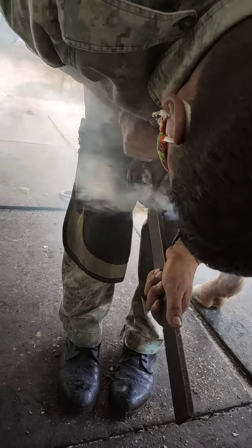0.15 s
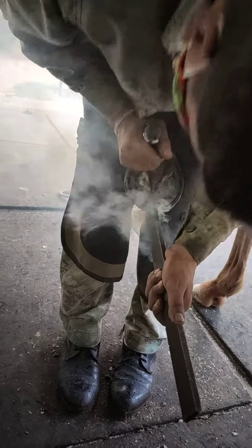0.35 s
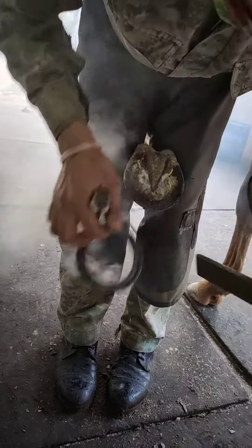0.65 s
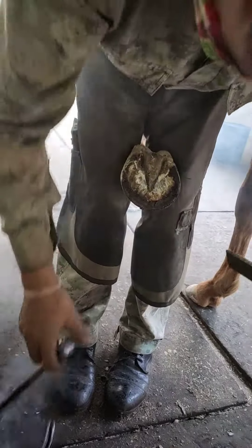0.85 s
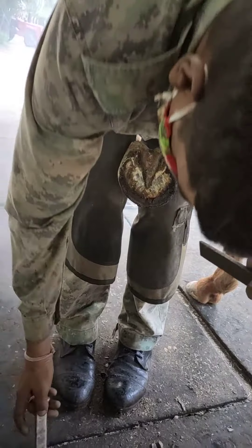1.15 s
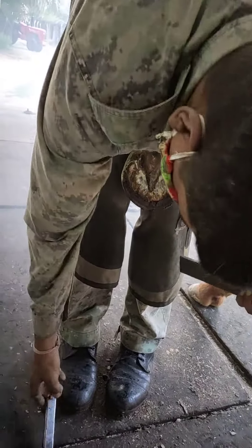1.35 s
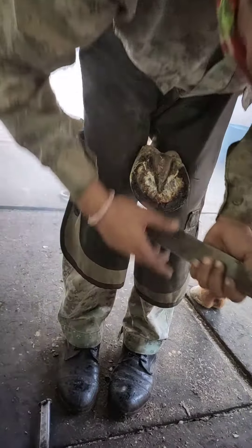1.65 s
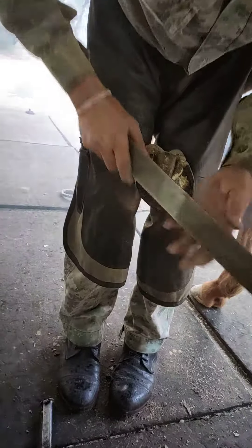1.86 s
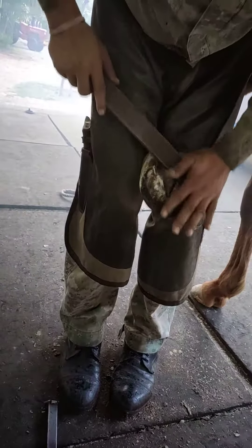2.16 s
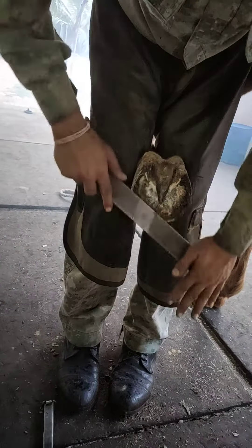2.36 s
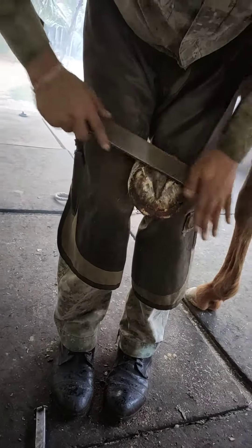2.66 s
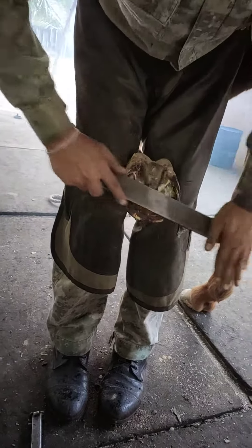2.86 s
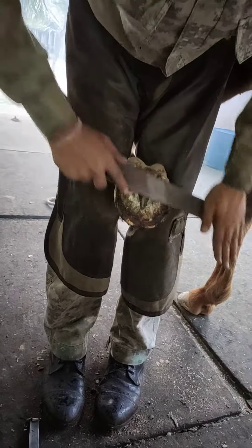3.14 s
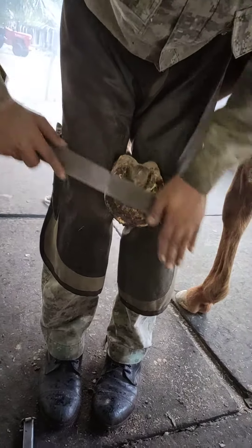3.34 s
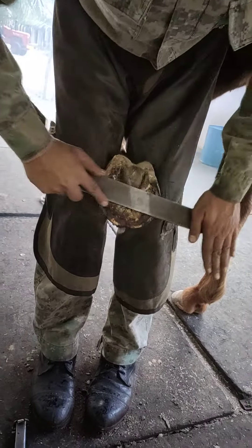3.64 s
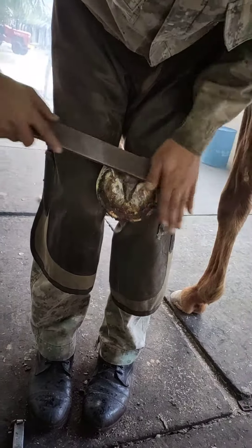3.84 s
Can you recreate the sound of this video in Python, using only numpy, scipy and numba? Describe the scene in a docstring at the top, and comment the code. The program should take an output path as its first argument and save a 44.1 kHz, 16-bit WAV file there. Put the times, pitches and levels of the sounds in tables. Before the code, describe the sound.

Outdoors or in an open shelter, wind buffeting dominates the microphone. Hot horn sizzles and snaps briefly, fades, and then a metal rasp scrapes the hoof in short gritty, ringing strokes, with a low fan-like roar behind.

```python
"""Gusty wind buffets and overloads two microphone ports separately, over the faint roar of a forge or fan.
A farrier lifts a hot shoe off a hoof: the scorched horn fizzes in tiny bursts of steam and spits sharp clicks.
After one soft swish, a rasp touches the horn, then is drawn to and fro: its teeth jolt and ring the blade,
while a dense spray of chips makes the grit. Wind is shaped puffs; the roar is coloured noise with two thin tones."""
import sys
import numpy as np
from scipy import signal
from scipy.fft import rfft, irfft
from scipy.io import wavfile
from scipy.ndimage import uniform_filter1d, map_coordinates
from numba import njit

SR = 44100
rng = np.random.default_rng(int(sys.argv[2]) if len(sys.argv) > 2 else 0)


def bounce(signal):
    """Save signal as a 16-bit WAV file at the path given by the first command-line argument."""
    frames = np.transpose(np.atleast_2d(signal))
    limited = np.clip(frames, -1, 1)
    pcm = np.round(limited * 32767).astype(np.int16)
    wavfile.write(sys.argv[1], SR, pcm)


def boost_factor(decibels):
    """Convert a level in decibels to a linear amplitude factor."""
    exponent = np.asarray(decibels, float) / 20
    return 10 ** exponent


N = 176400
TIME = np.arange(N) / SR  # s

# the left port hears the work later and louder
LAG_SAMPLES, PAN_DB = 3.46, 2.5
DIRECT = 0.26  # power share of the fizz and grit common to both ports


def curve(table, col):
    """One column of a time table, joined by straight lines."""
    table = np.array(table, float)
    return np.interp(TIME, table[:, 0], table[:, col])


def unit(x):
    """Scaled to rms 1."""
    return x / np.sqrt(np.mean(x ** 2, axis=-1, keepdims=True))


def colour(x, points):
    """Filter by (Hz, dB) points on a log-frequency axis."""
    hz, db = np.array(points, float).T
    bins_hz = np.arange(N // 2 + 1) * SR / N
    gain_db = np.interp(np.log(bins_hz + 1), np.log(hz), db)
    return irfft(rfft(x) * boost_factor(gain_db), N)


@njit
def svf(x, hz, width):
    """State-variable filter with moving centre: band and low outputs."""
    band, low, b, l = np.empty(len(x)), np.empty(len(x)), 0., 0.
    for i in range(len(x)):
        g, k = np.tan(np.pi * hz[i] / SR), width[i] / hz[i]
        v = (b + g * (x[i] - l)) / (1 + g * (g + k))
        low[i] = l + g * v
        b, l, band[i] = 2 * v - b, 2 * low[i] - l, k * v
    return band, low


def band(x, hz, width):
    """Band-pass, fixed or moving."""
    return svf(x, hz + np.zeros(N), width + np.zeros(N))[0]


def low(x, hz):
    """Two-pole low-pass, fixed or moving."""
    return svf(x, hz + np.zeros(N), 1.25 * hz + np.zeros(N))[1]


def walk(rate):
    """Random levels held 1 / rate s and slewed twice."""
    k = int(SR / rate)
    held = np.repeat(rng.standard_normal(N // k + 1), k)
    return 1.32 * uniform_filter1d(uniform_filter1d(held, k), k)[:N]


def clicks(rate, scatter):
    """Random impulses, rate per second, a few much larger than the rest."""
    happens = rng.random(N) < rate / SR
    size = np.minimum(rng.exponential(size=N), 3.5)
    sign = np.sign(rng.standard_normal(N))
    return unit(happens * boost_factor(scatter * size) * sign)


def decay(x, t60):
    """Each impulse dies away exponentially, by 60 dB in t60 seconds."""
    return signal.lfilter([1], [1, -np.exp(-np.log(1000) / (t60 * SR))], x)


def hump(middle, length, sharp=1.1):
    """Rounded swell of a movement that speeds up and slows down."""
    phase = np.clip((TIME - middle) / length, -.5, .5)
    return np.cos(np.pi * phase).clip(0) ** sharp


def ports(make, pan_db, direct):
    """A near source: part arrives directly at both ports, part is scattered and unlike left and right."""
    common = make()
    late = map_coordinates(common, [np.arange(N) - LAG_SAMPLES], mode="mirror")
    scattered = np.array([make(), make()])
    pair = np.sqrt(direct) * np.array([late, common]) + np.sqrt(1 - direct) * scattered
    return pair * boost_factor(np.array([[pan_db], [-pan_db]]) / 2)


def wind(table):
    """Eddies at one port: puffs of pressure give slow swings and faster buffeting; both climb in pitch when strong."""
    eddies = walk(35)
    strength = curve(table, 2) + 25  # dB
    rumble_flicker_db, buffet_flicker_db = 1.5, 2.5

    def puffs():
        return clicks(170, 4.0) + 0.86 * rng.standard_normal(N)

    swing_hz = np.clip(129 * boost_factor(0.27 * strength), 50, 300)
    knee_hz = 41  # the puffs' spectrum falls away above this
    slow_puffs = signal.lfilter([1], [1, -np.exp(-2 * np.pi * knee_hz / SR)], puffs())
    swing = low(slow_puffs, swing_hz)
    swing = swing - low(swing, 12.5)  # thins out the very lowest swings
    swing = unit(unit(swing) * boost_factor(rumble_flicker_db * eddies))

    buffet_hz = np.clip(200 + 4 * (strength + buffet_flicker_db * eddies), 90, 600)
    buffet = band(puffs(), buffet_hz, 1.04 * buffet_hz)
    buffet = low(low(buffet, 1.293 * buffet_hz), 6.2 * buffet_hz) / np.sqrt(buffet_hz)
    buffet = unit(buffet * boost_factor(buffet_flicker_db * eddies))
    return swing * boost_factor(curve(table, 1)) + buffet * boost_factor(curve(table, 2))


def yard():
    """Diffuse coloured-noise roar that wavers a little, with two thin wavering machine tones."""
    # steady roar: (frequency [Hz], relative density [dB per Hz])
    roar_colour = [(60, -14.5), (150, 2), (280, -12), (600, -11.5), (1100, -18), (1800, -17), (2300, -20.5),
                   (4500, -28), (7200, -29), (12000, -31), (16000, -38)]
    # faint machine tones: (centre pitch [Hz], peak level before wavering [dB])
    whine = [(1676, -54), (1894, -57)]
    roar = unit(colour(rng.standard_normal((2, N)), roar_colour)) * boost_factor(-35.5 + .8 * walk(3))

    def tone(hz):
        phase = 2 * np.pi * np.cumsum(hz + 7 * walk(12)) / SR
        return np.sin(phase + np.array([[0], [1.2]]))  # the right port leads in phase

    return roar + sum(boost_factor(db + 2.5 * walk(6)) * tone(hz) for hz, db in whine)


def fizz():
    """Steam and tiny bursts from the scorched horn, fading once the shoe is off."""
    # fizz of scorched horn before fade and panning: (time [s], level [dB])
    levels = [(0, -43.5), (.1, -42.5), (.19, -41.5), (.27, -45), (.36, -40.5), (.43, -45.5), (.49, -35.5),
              (.55, -46), (.68, -46), (.8, -51), (.92, -42), (1.05, -51), (1.25, -60)]
    # timbre of the fizz: (frequency [Hz], relative density [dB per Hz])
    fizz_colour = [(1760, -27), (3000, -1.5), (5750, -3), (7300, 1), (11500, -1), (14900, -4.5),
                   (16000, -18)]

    def steam():
        return unit(colour(rng.standard_normal(N) + 1.2 * clicks(900, 4.2), fizz_colour))

    fade = np.clip((1.3 - TIME) / 0.37, 0, 1)  # silent from 1.3 s
    return ports(steam, PAN_DB, DIRECT) * boost_factor(curve(levels, 1) + walk(16.4)) * fade


def ticks():
    """Sharp bright clicks with a few milliseconds of hiss behind."""
    # loud spits of the fizz, then chips snapping off under the rasp:
    # (time [s], peak before colouring [dB], left over right [dB])
    snaps = [(.195, -21, 3), (.458, -20, 3), (.486, -18, 5), (.515, -22, 2), (.566, -23, 2), (.576, -13, 4),
             (.597, -21, 4), (.652, -19, 4), (.659, -14, 5), (.689, -23, 1), (.716, -22, 1),
             (.7345, -21, 1), (.832, -10, 3), (2.177, -17, 0), (2.7395, -18, 2), (3.1007, -18, 2),
             (3.1145, -14, 2), (3.171, -15, 3), (3.5357, -15, 2), (3.5547, -17, 2), (3.8955, -20, 1),
             (3.9455, -8, 3)]
    # timbre of the clicks: (frequency [Hz], gain [dB])
    tick_colour = [(2000, -6), (5000, -9), (8000, 1.5), (11000, 2.5), (16000, -2.5)]
    hits = np.zeros((2, N))
    for s, db, pan_db in snaps:
        hits[:, int(s * SR)] = boost_factor(db + np.array([pan_db, -pan_db]) / 2)
    sign = np.sign(rng.standard_normal(N))
    noise = rng.standard_normal((2, N))
    snap = decay(hits, 0.0011) * sign
    hiss = boost_factor(-18) * decay(hits, 0.037) * noise
    left, right = colour(snap + hiss, tick_colour)
    return np.array([np.roll(left, round(LAG_SAMPLES)), right])


def slaps():
    """A strong eddy tears off the port: a narrow dip of pressure inside a wider rebound."""
    # sudden suction at the right port: (time [s], dip before the rebound is added [dB])
    suctions = [(0.3104, -1), (0.3807, 2), (0.4587, -3), (0.476, -6), (.667, -3), (0.78, 1.5), (0.878, -10),
                (1.878, -6), (1.9138, 3.5), (1.9267, -4), (1.9487, 1), (2.574, 7), (3.059, 2.5),
                (3.695, -3), (3.709, 3), (3.7397, 2)]
    dip_s, rebound = 0.0011, 4.2  # spread of the dip; the rebound is this many times wider and shallower

    def bell(t, width):
        return np.exp(-.5 * (t / width) ** 2)

    out = np.zeros(N)
    for s, db in suctions:
        t = TIME - s
        out += boost_factor(db) * (bell(t, rebound * dip_s) / rebound - bell(t, dip_s))
    return out


def swish():
    """One soft, smooth swell of treble hiss, perhaps cloth."""
    # timbre of the swish: (frequency [Hz], relative density [dB per Hz])
    swish_colour = [(1500, -21), (3500, -5.5), (5500, -4), (8400, -1.5), (12000, -6.5), (16000, -13)]
    hiss = unit(colour(rng.standard_normal((2, N)), swish_colour))
    return hiss * boost_factor(-39) * hump(1.45, 0.49, 1.45)


def rasp():
    """Teeth catch in uneven jolts that ring the blade; a dense spray of horn chips makes the grit."""
    # a brief first touch, then strokes, push and pull in turn:
    # (middle [s], length [s], grit level [dB], ring level [dB], ring centre [Hz])
    strokes = [(2.186, 0.036, -43, -57, 2820), (2.334, 0.21, -37, -52, 2950), (2.565, 0.12, -44, -57, 2640),
               (2.743, 0.19, -35.5, -41.5, 3000), (2.966, .15, -39.5, -46.5, 2540),
               (3.164, 0.18, -37, -39.5, 3000), (3.369, 0.18, -40, -45, 2650),
               (3.567, 0.14, -36.5, -37, 2900), (3.773, 0.18, -41, -41.5, 2620),
               (3.953, 0.14, -35.5, -35.5, 2900)]
    # steel blade modes: (frequency [Hz], width [Hz], level relative to the main ring [dB])
    blade = [(1552, 63, -18), (2360, 120, -14), (3700, 32, -18), (2010, 650, -15)]
    # timbre of the grit: (frequency [Hz], relative density [dB per Hz])
    grit_colour = [(1500, -5), (3000, -3), (4400, -6.5), (5600, -3.5), (8500, -2.5), (10700, -3),
                   (14700, -6), (16000, -4.5)]
    # how the left port colours the ring: (frequency [Hz], gain [dB])
    left_ring_tilt = [(1500, 4), (2500, -5.5), (3700, 2.5), (6000, -19)]
    # the right port is shaded from the top of the grit: (frequency [Hz], gain [dB])
    right_grit_tilt = [(5000, 2), (8000, -1.5), (14000, -2.5)]
    middles, lengths, grit_db, ring_db, pitches = np.array(strokes, float).T

    swells, bites = [], []
    for middle, length in zip(middles, lengths):
        drag = boost_factor(-6.5) * hump(middle, 1.92 * length)  # scrape left while the rasp turns
        swells.append(hump(middle, length) + drag)
        early_bite = hump(middle - .12 * length, .72 * length, .3)  # teeth bite early in each movement
        bites.append(early_bite + boost_factor(-6) * hump(middle, 1.52 * length))

    ring_hz = np.interp(TIME, middles, pitches) * (1 + .03 * walk(40))
    jolts = unit(decay(np.abs(clicks(370, 4)), 0.013)) + 1.3

    def ring():
        drive = jolts * rng.standard_normal(N)
        width_hz = 1.14 * 990  # of each of two filters in a row
        body = unit(band(band(drive, ring_hz, width_hz), ring_hz, width_hz))
        return body + sum(boost_factor(db) * unit(band(drive, hz, width)) for hz, width, db in blade)

    patches = boost_factor(-10.5 + 4.5 * walk(29.64))

    def grit():
        chips = clicks(5000, 5.6) + 0.95 * rng.standard_normal(N) + 0.4 * clicks(200, 3.5)
        spray = unit(colour((jolts + 3.7) * chips, grit_colour))
        spray = spray * boost_factor(1.5 * walk(120) + 1.56 * walk(30))
        # a bright patchy resonance sings above the ring
        sing_hz = 2.94 * ring_hz * boost_factor(0.65 * walk(12))
        return spray + patches * unit(band(spray, sing_hz, 1700))

    left, right = ports(ring, 0.59, 0.84)
    near, shaded = ports(grit, PAN_DB, DIRECT)
    ring_pair = np.array([colour(left, left_ring_tilt), right])
    grit_pair = np.array([near, colour(shaded, right_grit_tilt)])
    return ring_pair * (boost_factor(ring_db) @ np.array(bites)) + grit_pair * (boost_factor(grit_db) @ np.array(swells))


def scene():
    """Wind on the ports, rounded off when strong, over the work and the yard."""
    # wind at each port before overload: (time [s], slow rumble [dB], fast buffeting [dB])
    left_wind = [(0.0, -32, -32.5), (0.08, -11, -26), (0.13, -21, -38), (0.23, -25, -28.5),
                 (0.32, -16, -31), (0.4, -24, -36), (0.47, -11.5, -24), (0.52, -10.5, -26.5),
                 (0.6, -17, -34), (0.65, -20, -23.5), (0.71, -10, -43), (0.82, -19, -34), (0.9, -17, -41),
                 (0.92, -19, -28.5), (0.99, -30, -48), (1.2, -32, -33.5), (1.4, -26.5, -48),
                 (1.58, -16.5, -30.5), (1.69, -17.5, -68), (1.85, -21.5, -45), (1.92, -25, -37.5),
                 (1.98, -23, -26), (2.01, -10, -44), (2.04, -11.5, -18.5), (2.08, -9.5, -20),
                 (2.16, -10, -25.5), (2.29, -12.5, -25.5), (2.32, -15.5, -33), (2.39, -13, -26),
                 (2.55, -15, -42), (2.62, -15, -22), (2.7, -20, -46), (2.77, -4.5, -19.5), (2.84, -19, -44),
                 (2.93, -10.5, -24), (3.02, -30, -39), (3.06, -12, -32), (3.1, -17, -19.5),
                 (3.13, -15, -41), (3.19, -22, -37), (3.27, -19, -35), (3.3, -14, -22.5),
                 (3.4, -16.5, -35.5), (3.43, -11, -28), (3.45, -26, -32), (3.48, -14, -25.5),
                 (3.59, -19, -27.5), (3.63, -29, -61), (3.69, -10, -30), (3.71, -12, -43),
                 (3.76, -7.5, -28), (3.8, -28, -52), (3.84, -15, -29.5), (3.9, -15, -23.5),
                 (3.94, -16, -45), (3.99, -11.5, -21)]
    right_wind = [(0.0, -23, -32), (0.04, -8.5, -62), (0.08, -8, -19), (0.14, -11, -17.5),
                  (0.17, -17, -22.5), (0.22, -17.5, -33), (0.315, -10, -12), (0.345, -8, -29),
                  (0.37, -5, -13.5), (0.41, -7, -23), (0.47, -3, -21), (0.59, -25.5, -40), (0.66, -6, -15),
                  (0.7, -16, -28.5), (0.75, -15, -32), (0.78, -12, -19), (0.83, -28, -48),
                  (0.88, -11.5, -18), (0.91, -10, -35), (1.01, -29.5, -34.5), (1.1, -17.5, -30.5),
                  (1.15, -29, -42), (1.22, -22, -27.5), (1.28, -18, -36.5), (1.35, -11.5, -25),
                  (1.41, -18.5, -28.5), (1.45, -9, -21), (1.5, -22, -25.5), (1.54, -16, -26),
                  (1.6, -20, -48), (1.78, -31.5, -56), (1.83, -35, -51), (1.885, -8, -23),
                  (1.945, -15.5, -12), (1.97, -11, -15), (2.0, -8.5, -31), (2.11, -15, -29),
                  (2.17, -10, -16), (2.28, -13, -26.5), (2.34, -14.5, -21), (2.38, -6, -27),
                  (2.43, -12.5, -33), (2.47, -2.5, -23), (2.52, -6, -21), (2.58, -9.5, -14),
                  (2.66, -10.5, -29.5), (2.72, -10.5, -23), (2.75, -1.5, -15.5), (2.85, -13, -28.5),
                  (2.88, -12, -22), (2.91, -11.5, -20), (2.95, -8, -12), (3.0, -5, -20.5), (3.06, -5, -11),
                  (3.11, -5, -15.5), (3.15, -11, -35), (3.18, -10.5, -18), (3.22, -14.5, -27),
                  (3.25, -9.5, -19.5), (3.28, -12, -30.5), (3.31, -5.5, -9.5), (3.33, -8, -22.5),
                  (3.37, -5.5, -15.5), (3.43, -18, -34), (3.51, -12, -16.5), (3.55, -14.5, -43),
                  (3.59, -4, -12.5), (3.62, -11, -21.5), (3.65, -4.5, -13), (3.71, 0.5, -8.5),
                  (3.75, -0.5, -13), (3.78, -7.5, -16), (3.81, -22, -43), (3.89, -14.5, -21.5),
                  (3.93, -10, -39), (3.99, -34, -51)]
    port_limit = 1.4  # pressure swing at which a port saturates
    pressure = np.array([wind(left_wind), wind(right_wind) + slaps()])
    gusts = port_limit * np.tanh(pressure / port_limit)
    return gusts + rasp() + fizz() + ticks() + swish() + yard()


def roll_off(x):
    """The treble ends steeply here."""
    return signal.sosfilt(signal.butter(12, 16530, fs=SR, output="sos"), x)


def record(dry):
    """The top is cut off; the strongest gusts hit full scale and are cut flat."""
    top_cut = signal.ellip(10, .2, 70, 15750, fs=SR, output="sos")  # low-pass edge in Hz
    mix = np.clip(signal.sosfilt(top_cut, dry), -1, 1)
    return roll_off(mix)


dry = scene()
out = record(dry)
bounce(out)
```